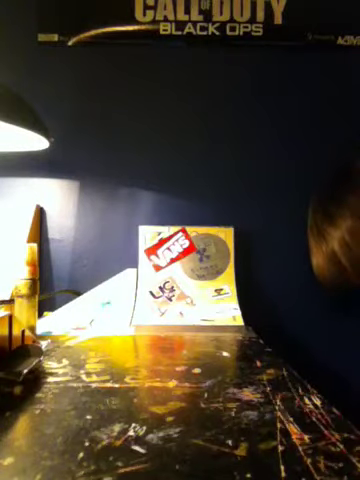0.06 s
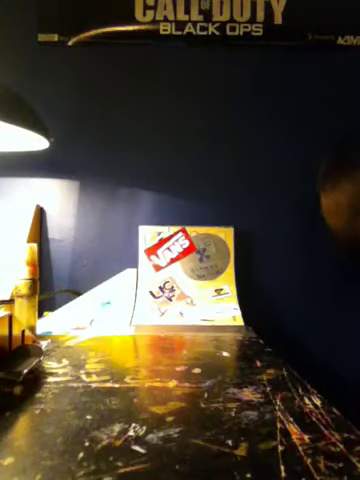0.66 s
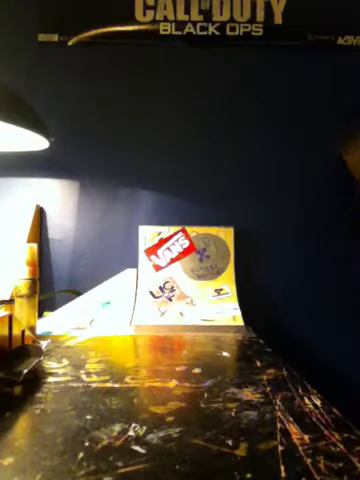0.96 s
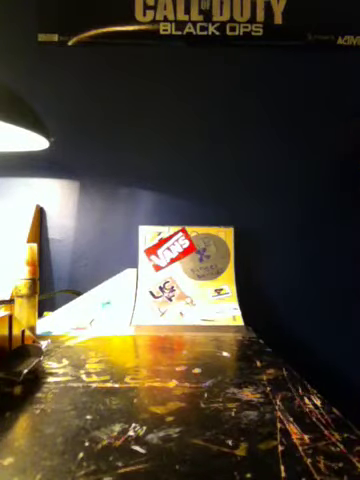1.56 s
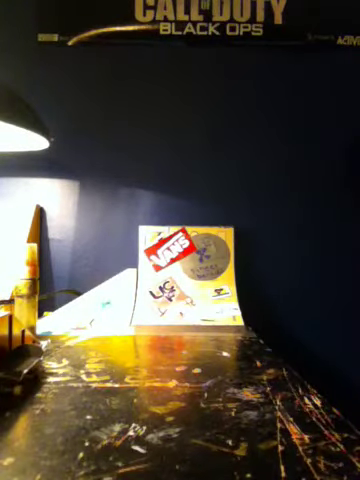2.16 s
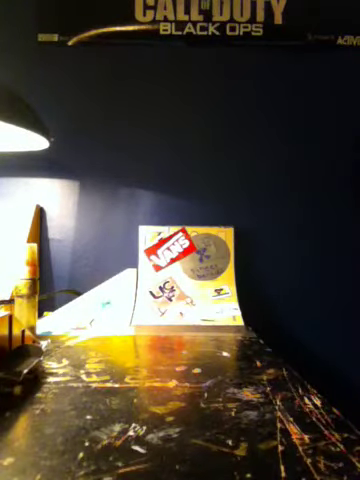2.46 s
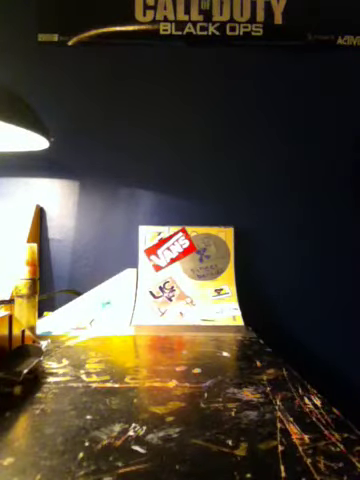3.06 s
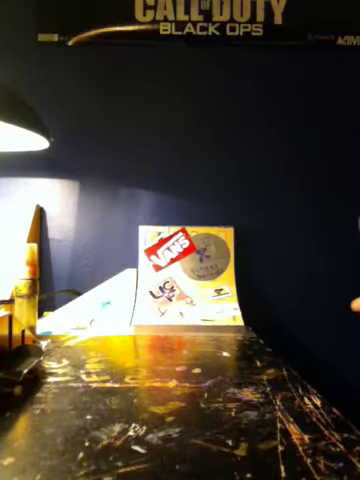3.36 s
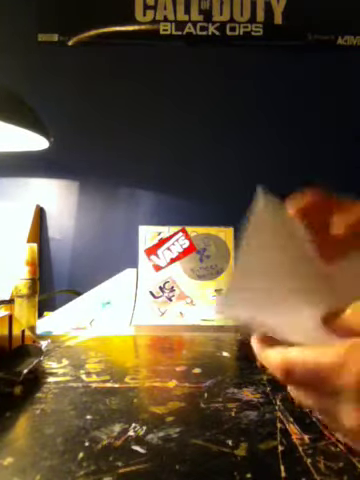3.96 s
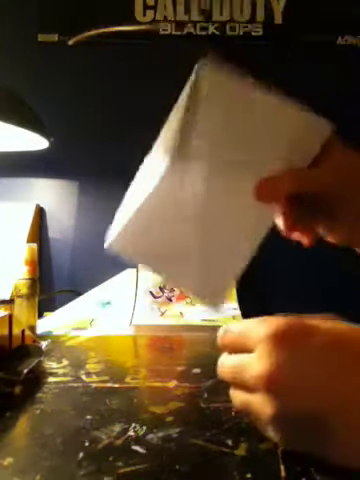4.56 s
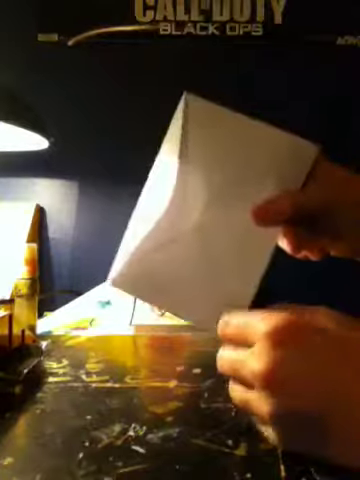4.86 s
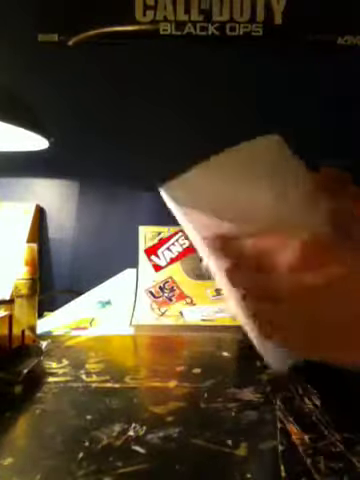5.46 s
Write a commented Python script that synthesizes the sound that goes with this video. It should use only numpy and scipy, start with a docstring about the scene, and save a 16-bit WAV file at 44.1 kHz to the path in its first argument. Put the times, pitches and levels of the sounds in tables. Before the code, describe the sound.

A folded sheet of paper is handled close to the microphone in a small, quiet room, over still air and a faint electrical hum. Right at the start it slides briefly across a wooden desk with a grainy scrape and a small snap, then slides again at about 0.7 seconds. Soft, dull knocks on the wood are scattered through the first three seconds, with faint rustles between them. From about 3.1 seconds the sheet is lifted and turned, and the sound grows louder and busier: paper rubs between fingers and creases buckle in crisp snaps, with low puffs of air around 3.4 seconds. Crinkling continues until about 4.6 seconds, then eases briefly. The loudest flurry comes from 5 to 5.3 seconds, with sharp snaps, two soft thumps of air from the swinging sheet and a short hollow finger scrape. The rustle fades by about 5.6 seconds.

```python
"""A folded sheet of paper is handled over a wooden desk in a small, quiet room.
First it slides, with a grainy rustle of slipping fibres, among soft knocks that ring the wood.
Then it is lifted and turned over: it rubs between the fingers, its creases buckle with crisp snaps
and the swinging sheet pushes out low puffs of air. One close microphone hears it all,
over a bed of still air and faint mains hum."""
import sys
import numpy as np
from scipy import signal
from scipy.fft import rfft, irfft
from scipy.io import wavfile

SR = 44100
rng = np.random.default_rng(int(sys.argv[2]) if len(sys.argv) > 2 else 0)


def transcribe(u):
    """Save the signal u as a 16-bit wav file named by the first command-line argument.

    u: samples, shape (n,) or (channels, n), limited to [-1, 1]; the rate is SR.
    q: integer samples, one column per channel.
    """
    v = np.clip(np.atleast_2d(u).T, -1, 1)
    q = np.round(v * 32767).astype(np.int16)
    wavfile.write(sys.argv[1], SR, q)


N = 242550
TIME = np.arange(N) / SR

# Colour of the room's still air. Each row: frequency in Hz, relative level in dB.
AIR_COLOUR = [(15, -49), (25, -20), (92, -9), (123, -6.5), (145, -9.5), (293, -9), (394, -15.5), (531, -24),
              (863, -22.5), (1070, -26), (2050, -24.5), (2220, -42), (3340, -31), (14800, -33),
              (16000, -38)]
# Mains hum and a faint electronic whine. Each row: frequency in Hz, rms level in dB.
HUM_TONES = [(120, -65), (14994, -96)]
# The room's tail. Each row: frequency in Hz, seconds to fall by 60 dB.
ROOM_DECAY = [(150, 0.34), (700, 0.18), (3000, 0.18), (12000, 0.19)]
# Soft knocks on the desk. Each row: start in seconds, relative level in dB,
# then low thump and high edge in dB against the mids.
DESK_KNOCKS = [(0.019, -30, -14, -12), (0.613, -26.5, -16, -3), (0.623, -35.5, -12, 5.5),
               (1.013, -31.5, -3, -5), (1.31, -27, -4.5, -12), (1.863, -39.5, -0.5, -8.5),
               (2.826, -28, -5, -14), (3.096, -30, -11, -11)]
# Ring of the wooden desk. Each row: frequency in Hz, width in Hz, gain in dB.
DESK_MODES = [(210, 42, 2.5), (392, 260, -2.5), (595, 67, 4.5), (731, 160, 5.5), (880, 75, 3.5),
              (990, 73, -5.5), (1710, 105, 4), (1990, 580, -8), (3160, 720, -15.5)]
# Colour of rubbing paper. Each row: frequency in Hz, relative level in dB.
FRICTION_COLOUR = [(100, 2), (220, 2), (400, 2), (580, 6), (800, 3), (1100, 0.5), (1900, 1.5), (3300, -1),
                   (4600, -6), (7000, -6.5), (10000, -14), (13000, -24.5), (16000, -38)]
# Strokes of paper on desk and skin. Each row: start and length in seconds, rasp level in dB,
# then rustle and hiss in dB against the rasp.
PAPER_STROKES = [(0.043, 0.04, -49.5, 3.5, -1), (0.083, 0.039, -38.5, -17.5, -3.5),
                 (0.167, 0.16, -60, -7.5, -0.5), (0.534, 0.077, -53.5, -9, -3), (0.672, 0.13, -45, -14, -9),
                 (0.977, 0.14, -59.5, -5, -1.5), (1.198, 0.2, -62.5, -0.5, 0.5),
                 (1.877, 0.06, -55, -0.5, 0.5), (2.016, 0.11, -64, -0.5, 0.5),
                 (2.255, 0.028, -62.5, -6, 1.5), (2.388, 0.069, -58.5, -4, 3), (2.508, 0.43, -58.5, -1, 3),
                 (2.904, 0.045, -51, 4, -1), (3.085, 0.058, -45.5, 3, 0), (3.219, 0.04, -49, 9.5, -5),
                 (3.304, 0.039, -44, 5, -3.5), (3.374, 0.072, -37.5, -10.5, -3.5),
                 (3.53, 0.11, -49.5, -2, 0), (3.628, 0.033, -43.5, -9, 0), (3.719, 0.057, -46, 2.5, 2.5),
                 (3.775, 0.031, -35, -14, -9), (3.852, 0.041, -38.5, -11.5, -1),
                 (4.011, 0.15, -47, -0.5, 3.5), (4.157, 0.09, -50, -8, 5), (4.341, 0.056, -51, 0, 3),
                 (4.463, 0.037, -58, 16, -20), (4.993, 0.078, -54, 10.5, 4), (5.037, 0.15, -44, 0, -4.5),
                 (5.193, 0.032, -49, 7, -2), (5.323, 0.068, -52, 7, 0), (5.362, 0.16, -47.5, -8.5, -0.5)]
# Hollow ring of the bent sheet. Each row: frequency in Hz, width in Hz, gain in dB.
BENT_SHEET_MODES = [(610, 190, -4), (1090, 140, 3.5), (1400, 260, 1)]
# Puffs from the swinging sheet. Each row: start in seconds, level in dB, pitch in Hz.
AIR_PUFFS = [(3.346, -40, 110), (3.402, -40, 114), (5.07, -30.5, 189), (5.2, -35, 185)]
# Ring of the folded sheet. Each row: frequency in Hz, width in Hz, gain in dB.
SHEET_MODES = [(213, 202, 0.5), (524, 240, 1), (1100, 245, -1), (1520, 270, -2), (1780, 770, -5.5),
               (3110, 320, -0.5), (3780, 580, -2.5), (5600, 1520, -4.5), (7950, 4600, -13.5)]
# The sheet buckles and flaps. Each row: start in seconds, relative level in dB,
# then low flap and high crack in dB against the mids.
CREASE_SNAPS = [(0.103, -24.5, -12, -6), (3.116, -20, -6, -18), (3.128, -24.5, 2, -20),
                (3.347, -25.5, -2, -8), (3.402, -15.5, -6, 0.5), (3.458, -19, -6, -4.5),
                (3.877, -17, -28, 5.5), (3.972, -24, -13, -23), (4.001, -25, -5.5, 1.5),
                (4.053, -19.5, -8, -1), (4.061, -21, -19, -2.5), (4.263, -23, -4, -19),
                (4.427, -22, -2, -9), (4.446, -28, -7, -19), (4.488, -30, 2, -25), (4.523, -22.5, -2, -18),
                (4.577, -34, 2, -23), (5.008, -32, -2, -5.5), (5.052, -12, -8.5, -9.5),
                (5.073, -16.5, -5, -16), (5.086, -12.5, -13.5, -8), (5.152, -18.5, -18, -1),
                (5.162, -25, -2, -7), (5.176, -18, -12, -8), (5.306, -27.5, -2, -13), (5.327, -31.5, 2, -7)]


def from_db(db):
    """Decibels to gain."""
    return 10 ** (np.asarray(db) / 20)


def unit_rms(x):
    """Scale to an rms of one."""
    return x / np.sqrt(np.mean(x ** 2) + 1e-20)


def at_hz(points, hz):
    """Read a table on a log-frequency axis."""
    table_hz, values = np.transpose(points)
    return np.interp(np.log(np.maximum(hz, 1)), np.log(table_hz), values)


def coloured(x, colour):
    """EQ a steady signal with a smooth curve, at unit rms."""
    gains = from_db(at_hz(colour, np.arange(N // 2 + 1) * SR / N))
    return unit_rms(irfft(rfft(x) * gains, N))


def band(x, low_hz, high_hz, order=3):
    """Band-pass filter."""
    sos = signal.butter(order, [low_hz, high_hz], "band", fs=SR, output="sos")
    return signal.sosfilt(sos, x + 1e-18)


def drift(per_s):
    """A random wobble at unit rms."""
    knots = rng.standard_normal(N // 20)
    return unit_rms(np.interp(TIME * per_s, np.arange(len(knots)), knots))


def resonate(x, modes):
    """Ring a body: parallel resonances of alternating polarity."""
    out = 0
    for k, (hz, width_hz, db) in enumerate(modes):
        radius = np.exp(-np.pi * width_hz / SR)
        poles = [1, -2 * radius * np.cos(2 * np.pi * hz / SR), radius ** 2]
        gain = (-1) ** k * from_db(db) * (1 - radius ** 2) / 2
        out = out + gain * signal.lfilter([1, 0, -1], poles, x + 1e-18)
    return out


def grains(per_s, spread_db):
    """Fibres slip as random clicks; more spread makes their sizes more uneven."""
    sizes = from_db(spread_db * np.minimum(rng.exponential(1, N), 4)) * rng.choice([-1, 1], N)
    return unit_rms(sizes * (rng.random(N) < per_s / SR))


def contacts(rows, modes, decay_s, edges_hz, trim_db, spread_db, attack_s=0.0009):
    """Each hit is a dying volley of tiny slips ringing a body, balanced in lows, mids and highs."""
    t = np.arange(SR // 8) / SR
    envelope = (1 - np.exp(-t / attack_s)) * from_db(-60 * t / decay_s)
    out = np.zeros(N + len(t))
    for start_s, db, low_db, high_db in rows:
        slips = rng.standard_normal(len(t))
        grit_db = spread_db * rng.standard_normal(len(t) // 16 + 1).repeat(16)[:len(t)]
        body = resonate(slips * from_db(grit_db) * envelope, modes)
        at = min(round(start_s * SR), N)
        for k, part_db in enumerate([low_db, 0, high_db]):
            part = unit_rms(band(body, edges_hz[k], edges_hz[k + 1]))
            out[at:at + len(t)] += from_db(db + part_db + trim_db) * part
    return out[:N]


def room(x, wet_db, predelay_s):
    """Close walls answer after a short gap with a tail that dies band by band."""
    t, tail = np.arange(SR // 2) / SR, 0
    edges_hz = np.geomspace(60, 18000, 9)
    for low, high in zip(edges_hz, edges_hz[1:]):
        decay_s = at_hz(ROOM_DECAY, np.sqrt(low * high))
        tail = tail + band(rng.standard_normal(len(t)), low, high) * from_db(-60 * t / decay_s)
    tail = tail * np.clip(t / predelay_s - 1, 0, 1)
    return x + from_db(wet_db) * signal.fftconvolve(x, tail / np.linalg.norm(tail))[:N]


def room_tone(air_db=-57):
    """The bed: still air, mains hum and a thin whine."""
    air = from_db(air_db) * coloured(rng.standard_normal(N), AIR_COLOUR)
    hum = sum(from_db(db) * np.sin(2 * np.pi * (hz * TIME + rng.random())) for hz, db in HUM_TONES)
    return air + np.sqrt(2) * hum


def desk_knocks():
    """Dull blows ring the wood, some way off the microphone."""
    blows = contacts(DESK_KNOCKS, DESK_MODES, decay_s=0.025, edges_hz=[110, 500, 1200, 4200],
                     trim_db=-21, spread_db=5.5)
    return room(blows, wet_db=-1, predelay_s=0.0042)


def stroke_envelope(start_s, end_s, attack_s=0.045, release_db_per_s=159):
    """A stroke gathers speed, then the paper glides to rest."""
    swell = np.clip((TIME - start_s) / attack_s, 0, 1)
    return swell * from_db(-release_db_per_s * np.clip(TIME - end_s, 0, 1))


def friction_levels(stir_db=-67):
    """Level curves in dB for rustle, rasp and hiss: all strokes over a faint, constant stirring."""
    power = from_db(stir_db + np.array([[1.5], [0], [-2]])) ** 2
    for start_s, length_s, rasp_db, rustle_db, hiss_db in PAPER_STROKES:
        gains = from_db(rasp_db + np.array([[rustle_db], [0], [hiss_db]]))
        power = power + (gains * stroke_envelope(start_s, start_s + length_s)) ** 2
    return 10 * np.log10(power)


def friction_texture(low_hz, high_hz, per_s, spread_db):
    """One band of slipping fibres in the colour of paper, at unit rms."""
    return unit_rms(band(coloured(grains(per_s, spread_db), FRICTION_COLOUR), low_hz, high_hz))


def paper_rubbing(rustle_db, rasp_db, hiss_db):
    """Sliding paper: a lumpy rustle of the whole sheet, a grainy rasp, a fine hiss and a top sheen."""
    catch = drift(per_s=70)  # the surface catches and lets go
    rustle = friction_texture(114, 1040, per_s=900, spread_db=2) * from_db(rustle_db + 2.1 * catch)
    rasp = friction_texture(1230, 4360, per_s=3800, spread_db=0) * from_db(rasp_db + 1.33 * catch)
    hiss = friction_texture(4400, 11900, per_s=14000, spread_db=2.5) * from_db(hiss_db + 1.47 * catch)
    sheen_db = -57 + 1.23 * (hiss_db + 45.5)  # climbs faster than the hiss: quick strokes brighten
    sheen = unit_rms(band(grains(per_s=9700, spread_db=8), 8400, 13400, order=2)) * from_db(sheen_db)
    return room(rustle + rasp + hiss + sheen, wet_db=-10, predelay_s=0.0035)


def finger_drag(level_db=-40):
    """Fingers stick and slip on the bent sheet, which answers with a hollow scrape."""
    scrape = unit_rms(resonate(grains(per_s=600, spread_db=2.5), BENT_SHEET_MODES))
    envelope = stroke_envelope(start_s=5.11, end_s=5.235)
    return room(from_db(level_db) * scrape * envelope, wet_db=-20, predelay_s=0.005)


def air_puffs(attack_s=0.0069, width_hz=60):
    """The swinging sheet pushes air in soft, low thumps."""
    out = 0
    for start_s, db, hz in AIR_PUFFS:
        age = np.maximum(TIME - start_s, 0) / attack_s
        air = unit_rms(band(rng.standard_normal(N), hz - width_hz / 2, hz + width_hz / 2))
        out = out + from_db(db) * air * age * np.exp(1 - age)
    return out


def crinkles(rasp_db, held_s=(3.3, 6.5), per_s=22, boost_db=11, spread_db=8, flap_db=-4, crack_db=-14):
    """Small creases give way at random in the held sheet: extra snap rows that ride the rasp's level."""
    wait, softness = rng.random((2, N // 1000))
    starts_s = held_s[0] + np.cumsum(2 * wait / per_s)
    levels_db = np.interp(starts_s, TIME, rasp_db) + boost_db - spread_db * softness
    return [(s, db, flap_db, crack_db) for s, db in zip(starts_s, levels_db) if s < held_s[1]]


def paper_snaps(rows):
    """Creases pop through and the stiff sheet rings for a moment."""
    pops = contacts(rows, SHEET_MODES, decay_s=0.027, edges_hz=[80, 700, 2500, 14000],
                    trim_db=-23, spread_db=3)
    return room(pops, wet_db=-7.5, predelay_s=0.0027)


def scene():
    """Mix room, desk and paper; one microphone feeds both channels."""
    rustle_db, rasp_db, hiss_db = friction_levels()
    mix = room_tone() + desk_knocks()
    mix += paper_rubbing(rustle_db, rasp_db, hiss_db) + finger_drag() + air_puffs()
    mix += paper_snaps(CREASE_SNAPS + crinkles(rasp_db))
    return np.tile(mix, (2, 1))


def record(dry):
    """A steep high cut at 15.9 kHz."""
    return signal.sosfilt(signal.ellip(12, 0.1, 80, 15900, fs=SR, output="sos"), dry)


dry = scene()
out = record(dry)
transcribe(out)
```